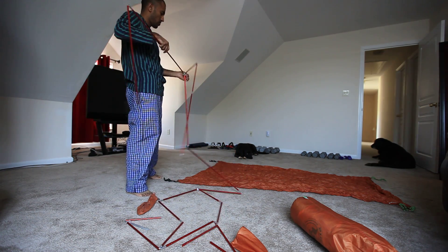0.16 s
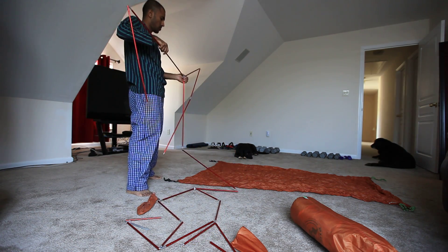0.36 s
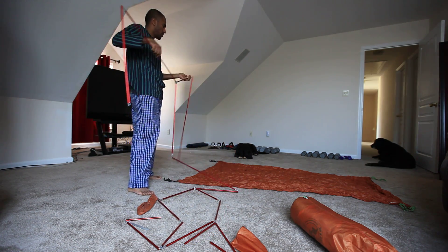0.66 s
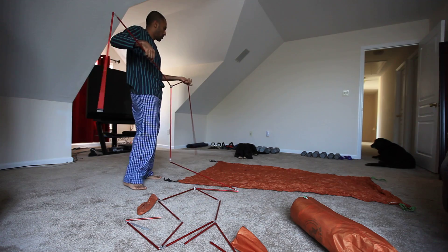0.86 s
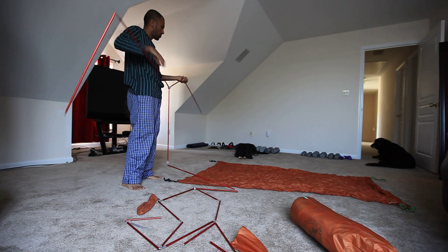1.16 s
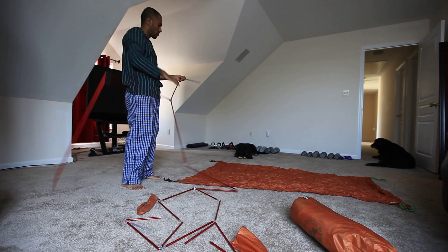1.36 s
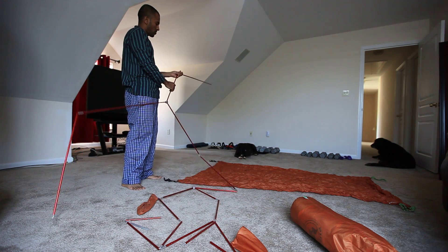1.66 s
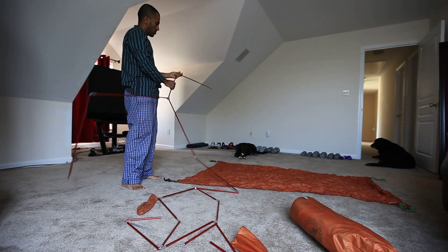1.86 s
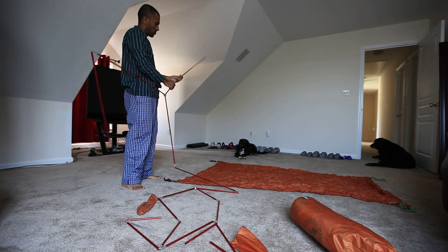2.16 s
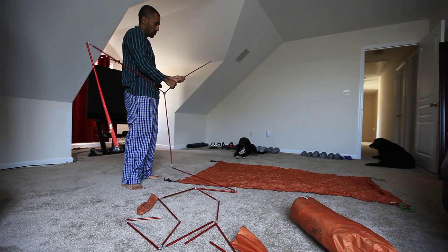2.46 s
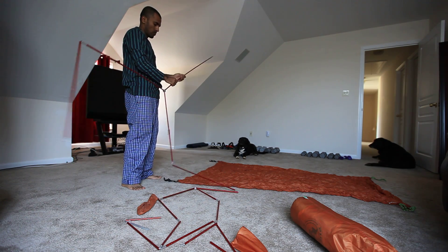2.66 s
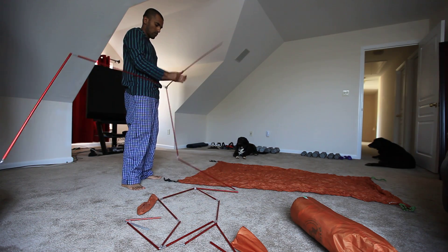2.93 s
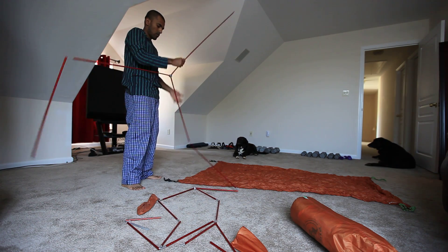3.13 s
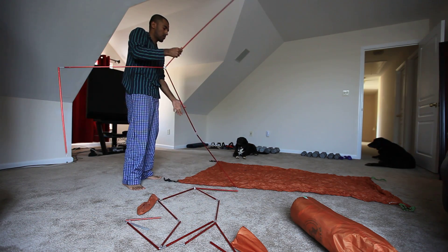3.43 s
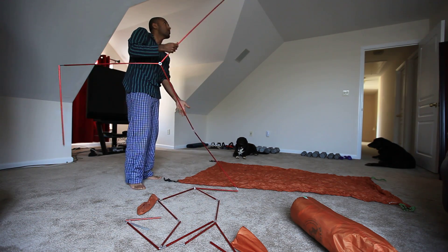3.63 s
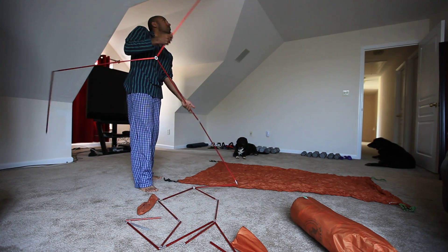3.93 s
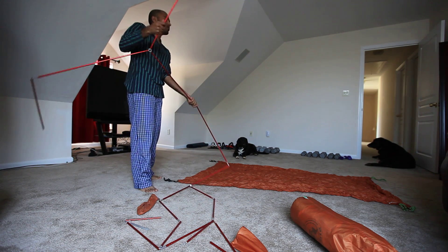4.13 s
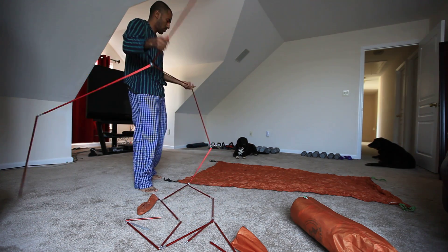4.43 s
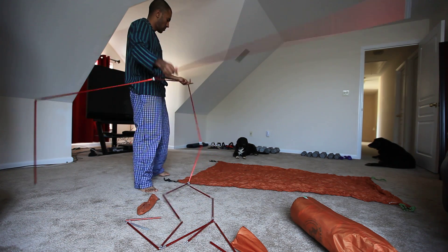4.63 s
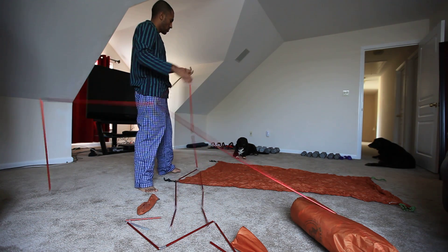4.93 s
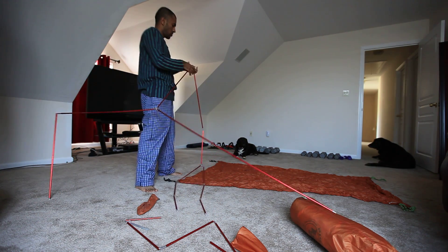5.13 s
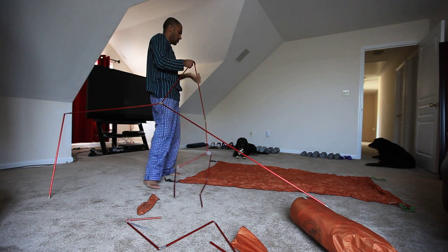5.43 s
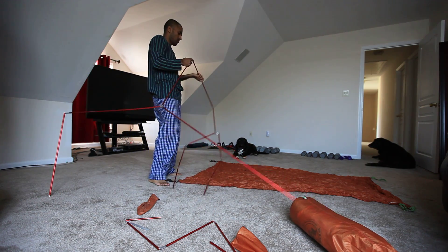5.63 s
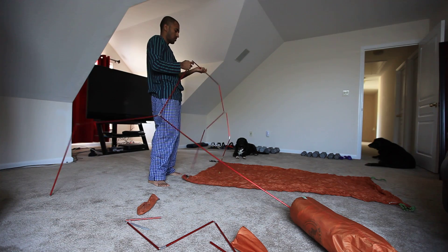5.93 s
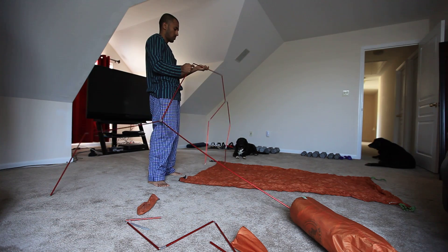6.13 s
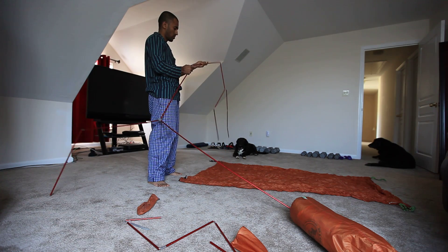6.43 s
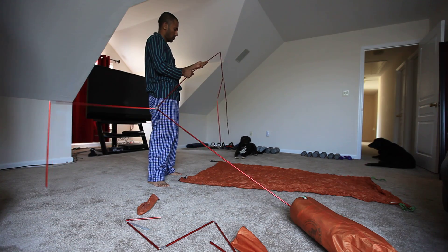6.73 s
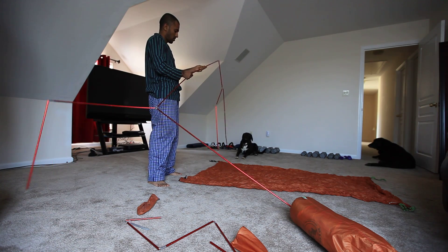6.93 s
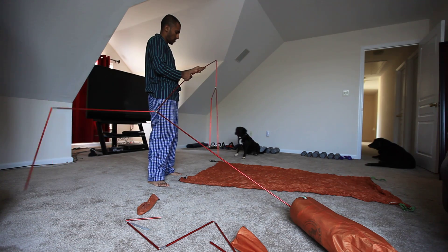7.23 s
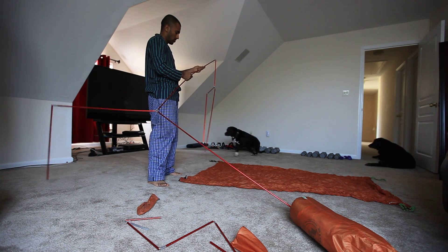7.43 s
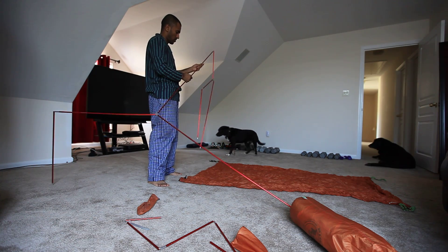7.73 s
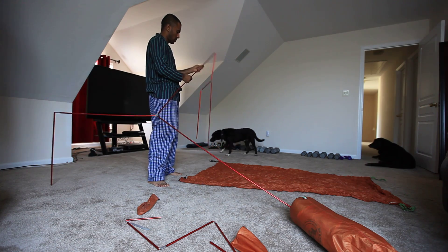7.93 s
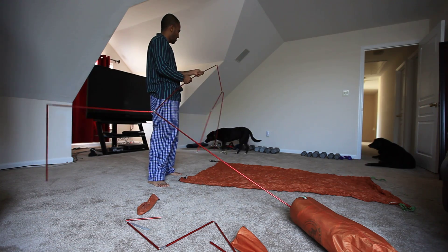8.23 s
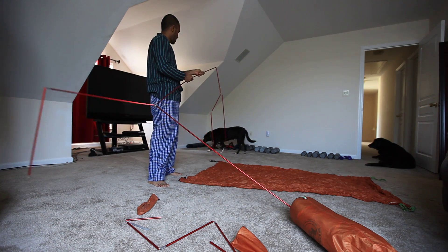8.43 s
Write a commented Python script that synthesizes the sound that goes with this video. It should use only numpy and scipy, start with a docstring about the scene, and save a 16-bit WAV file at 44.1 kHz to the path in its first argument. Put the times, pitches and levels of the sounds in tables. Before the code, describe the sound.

Sharp, irregular snaps and light rattles of a metal tent pole being unfolded indoors, over quiet clothing rustle and low room hum.

```python
"""Sharp metal snaps, ticks and rattles: a shock-corded aluminium tent pole unfolds in a carpeted attic.
The cord pulls each section into its ferrule; brief contact chatter rings the tube's modes.
Loose ends thud on the carpet, fabric rustles and a hand slides along the tube.
A dog's collar tags tinkle faintly over low room rumble; gain control ducks it all after hard snaps."""
import sys
import numpy as np
from scipy import signal
from scipy.fft import rfft, irfft
from scipy.io import wavfile
from scipy.ndimage import uniform_filter1d

SR = 44100
rng = np.random.default_rng(int(sys.argv[2]) if len(sys.argv) > 2 else 0)


def unload_audio(sound):
    """Save the sound as a 16-bit wav file, at the path given as the first command line argument."""
    columns = np.transpose(np.atleast_2d(sound))
    # keep every value between -1 and 1, then stretch to whole-number steps
    steps = np.round(np.clip(columns, -1, 1) * 32767)
    wavfile.write(sys.argv[1], SR, steps.astype(np.int16))


N = 378378
TIME = np.arange(N) / SR
HIT = 8192  # samples per impact
AGE, FREQ = np.arange(HIT) / SR, np.arange(HIT // 2 + 1) * SR / HIT
LEAD_S = 0.006  # silence ahead of each strike

# tube modes: f/Hz, width/Hz, level/dB
TUBE_MODES = [(1560, 50, 14), (1740, 61, 1.5), (2100, 120, -7), (2380, 61, -12.5), (2713, 160, 7),
              (2980, 110, 6.5), (3550, 420, 5.5), (4400, 120, -28), (4830, 120, 13), (5850, 55, -6.5),
              (6070, 81, -1), (6550, 130, -13), (6630, 33, 3.5), (7880, 110, 9.5), (8100, 50, -2),
              (9200, 50, -16.5), (10300, 60, -4), (10700, 120, 3), (13900, 130, -18), (14500, 90, 12.5)]
# metal contact spectrum: f/Hz, level/dB
CLICK_SPECTRUM = [(100, -15.5), (400, -37.5), (1000, -24.5), (2000, -14), (4000, -1.5), (7000, 5),
                  (9000, -1), (11000, -8), (12500, -17.5), (15500, -23)]
# fabric rustle as the arms move: t/s, level/dB
ARM_MOTION = [(0, -44.5), (.1, -32.5), (.4, -49), (.7, -50.5), (1.3, -55.5), (1.62, -39), (2.05, -71),
              (2.8, -51), (3.55, -68.5), (4.08, -36), (4.3, -47.5), (4.7, -46), (5.05, -35.5), (5.6, -46.5),
              (5.78, -48), (6.85, -49), (7.5, -90), (8.58, -63.5)]


def undb(db):
    """Decibels to gain."""
    return 10 ** (np.asarray(db) / 20)


def unit(x):
    """Scale to rms 1."""
    return x / np.sqrt(np.mean(x ** 2) + 1e-18)


def curve(rows):
    """Gain along a (t/s, level/dB) curve, silent outside it."""
    return undb(np.interp(TIME, *np.transpose(rows), left=-200, right=-200))


def colour(x, spectrum):
    """Filter by a (f/Hz, level/dB) spectrum."""
    hz, db = np.transpose(spectrum)
    f = np.arange(len(x) // 2 + 1) * SR / len(x)
    return irfft(rfft(x) * undb(np.interp(np.log(f + 1), np.log(hz), db)), len(x))


def resonance(f, hz, width_hz):
    """Response of one damped mode, 1 at its centre."""
    return 1 / (1 + 2j * (f - hz) / width_hz)


def add(track, s, sound):
    """Mix a sound in at time s."""
    start = int(np.clip(s * SR, 0, N - 1))
    track[start:start + len(sound)] += sound[:N - start]


def background(air_db=-45):
    """Low hum and rumble of the house with a faint hiss."""
    # hum bands: f/Hz, width/Hz, level/dB
    bands = [(35.56, 2.5, -47.5), (85, 7.1, -53), (120.45, 4.8, -55.5), (136.8, 4, -61)]
    # room noise spectrum: f/Hz, level/dB
    air_spectrum = [(12, -33), (20, 1), (38, -3), (60, -9), (86, -3.5), (182, -20), (310, -13),
                    (678, -27.5), (738, -24.5), (1960, -31), (2200, -34.5), (7110, -31), (10200, -40),
                    (12400, -45), (16000, -48.5)]
    f = np.arange(N // 2 + 1) * SR / N
    hum = sum(undb(db) * unit(irfft(rfft(rng.standard_normal(N)) * resonance(f, hz, width_hz) ** 2, N))
              for hz, width_hz, db in bands)
    return hum + undb(air_db) * unit(colour(rng.standard_normal(N), air_spectrum))


def attic(x, t60_s=(0.32, 0.28, 0.17), wet_db=-3, build_s=0.00069, echo_s=0.033, echo_db=-25.5):
    """One far-wall echo and a dense tail off sloping walls; treble dies first."""
    t = np.arange(SR // 2) / SR
    move_s = 0.3  # the tail changes as the pole moves
    build = 1 - np.exp(-(t / build_s) ** 2)
    splits = [signal.butter(2, hz, fs=SR, output="sos") for hz in (1500, 9500)]
    out = x + undb(echo_db) * np.pad(x, (int(echo_s * SR), 0))[:N]
    for s in np.arange(0, N / SR + move_s, move_s):
        noise = rng.standard_normal(len(t))
        low, below_top = (signal.sosfiltfilt(sos, noise) for sos in splits)
        bands = low, below_top - low, noise - below_top
        tail = build * sum(band * undb(-60 * t / t60) for band, t60 in zip(bands, t60_s))
        near = np.abs(TIME - s) < move_s
        faded = x[near] * np.cos(np.pi / 2 * (TIME[near] - s) / move_s)
        add(out, TIME[near][0], undb(wet_db) * signal.fftconvolve(faded, unit(tail) / np.sqrt(len(t))))
    return out


def clinks():
    """The collar's steel ring knocks its buckle and rings at several pitches."""
    # knocks: t/s, level/dB
    knocks = [(6.759, -44), (6.93, -51), (7.521, -55), (7.821, -52.5)]
    # ring modes: f/Hz, level/dB, t60/s
    modes = [(2500, -1, 0.11), (4330, -1.5, .12), (6450, -3.5, .08), (7607, -2, .08), (10850, -0.5, .08),
             (13550, -13, .08)]
    out = np.zeros(N)
    for s, db in knocks:
        for hz, mode_db, t60 in modes:
            start_db = db + mode_db + 2 * rng.standard_normal()
            add(out, s, undb(start_db - 60 * AGE / t60) * np.sin(2 * np.pi * hz * AGE))
    return out


def tags(tick_db=-1, tick_s=0.0022, ring_db=-8, bounce_s=0.0044, bounce_db=-11):
    """The dog's metal tags buzz together, ring briefly and bounce once."""
    # touches: t/s, level/dB
    touches = [(1.926, -37), (1.973, -32.5), (2.168, -36), (2.302, -37), (6.804, -31), (6.932, -27.5),
               (7.565, -33), (7.927, -25.5), (8.061, -41.5), (8.117, -42.5), (8.151, -38.5), (8.327, -39),
               (8.525, -34.5)]
    # tag modes: f/Hz, level/dB, t60/s
    modes = [(5560, -13, 0.14), (6220, 5, 0.11), (6800, -11, 0.16), (7400, 0, .05), (8650, -4, 0.02),
             (11600, -1, .05), (11900, -18, 0.15), (12750, -4.5, .09), (14600, -19, 0.11)]
    # tag contact spectrum: f/Hz, level/dB
    tick_spectrum = [(2000, -29), (4500, -25), (6300, 6), (8000, 2), (10000, -5.5), (12400, -4.5),
                     (13200, -13.5), (15500, -20)]
    out = np.zeros(N)
    for s, db in touches:
        first, second = rng.standard_normal((2, HIT))
        low_db = np.interp(s, (5.8, 9.7), (-12, 1))  # low modes muffled until the dog gets up
        gap_s = bounce_s * np.exp(0.33 * first[-1])
        for late_s, drop_db, noise in (0, 0, first), (gap_s, bounce_db, second):
            ring = np.zeros(HIT)
            for (hz, mode_db, t60), jitter in zip(modes, noise):
                decay = undb(mode_db + low_db * (hz < 10000) + 2.8 * jitter - 60 * AGE / t60)
                ring += decay * np.sin(2 * np.pi * hz * (1 + 0.0068 * jitter) * AGE)
            tick = unit(colour(noise, tick_spectrum)) * np.exp(-AGE / tick_s)
            add(out, s + late_s, undb(db + drop_db) * (undb(ring_db) * ring + undb(tick_db) * tick))
    return out


def friction(spectrum, grain_db, grain_s):
    """Rubbing: a stream of tiny, uneven slips."""
    slips = unit(uniform_filter1d(rng.standard_normal(N), max(int(grain_s * SR), 2)))
    return unit(colour(rng.standard_normal(N) * undb(grain_db * slips), spectrum))


def cloth(gain_db=-3):
    """Fabric rubs as the arms swing."""
    # rustle spectrum: f/Hz, level/dB
    spectrum = [(100, -28), (500, -8), (1200, -7.5), (3000, -5), (7000, 0), (9500, -9.5), (12500, -18.5),
                (16000, -29)]
    return undb(gain_db) * friction(spectrum, grain_db=4, grain_s=0.0014) * curve(ARM_MOTION)


def hand_slide(gain_db=-2):
    """A hand rubs along the pole once."""
    # stroke: t/s, level/dB
    stroke = [(5.954, -24.5), (5.96, -26.5), (5.987, -21), (6.03, -30.5), (6.085, -19.5), (6.135, -33.5),
              (6.17, -24), (6.22, -59)]
    # hand-on-tube spectrum: f/Hz, level/dB
    spectrum = [(180, -21), (300, -15), (737, -11), (1040, -12.5), (1340, -5.5), (1930, -12), (2930, -9),
                (4230, -12.5), (6520, -7), (16000, -33.5)]
    return undb(gain_db) * friction(spectrum, grain_db=3.5, grain_s=0.0051) * curve(stroke)


def thuds(boom_s=0.0079, boom_db=-2, scuff_s=0.0093):
    """Carpet cushions a falling pole end: short floor boom, dull scuff."""
    # landings: t/s, level/dB, boom f/Hz, relative scuff/dB
    landings = [(1.449, -16.5, 410, -1.5), (1.475, -30, 288, 4.5), (4.381, -20, 242, -11.5),
                (4.92, -17.5, 227, -1), (4.944, -28, 280, 1.5), (4.983, -18.5, 295, -8),
                (4.989, -18.5, 119, -13.5)]
    # scuff spectrum: f/Hz, level/dB
    spectrum = [(30, -6.5), (100, -0.5), (200, 3), (330, 2.5), (500, -7.5), (700, -13.5), (1000, -11),
                (2500, -12), (8000, -31.5)]
    out = np.zeros(N)
    for s, db, hz, scuff_db in landings:
        boom = np.sin(2 * np.pi * hz * AGE) * np.exp(-AGE / boom_s)
        scuff = unit(colour(rng.standard_normal(HIT), spectrum)) * np.exp(-AGE / scuff_s)
        add(out, s, undb(db) * (undb(boom_db) * boom + undb(scuff_db) * scuff))
    return out


def tube(gains, ring_db=-4):
    """Section response: bare contact plus modes, weighted by where the blow lands."""
    modes = sum(gain * undb(db) * resonance(FREQ, hz, width_hz)
                for gain, (hz, width_hz, db) in zip(gains, TUBE_MODES))
    return 1 + undb(ring_db) * modes


def scrape(ring_db=6, gain_db=-2):
    """A ferrule dragged along its tube keeps the modes singing."""
    # drag: t/s, level/dB
    drag = [(3.9, -71), (3.97, -47), (4.08, -43), (4.2, -41.5), (4.28, -65.5)]
    # metal friction spectrum: f/Hz, level/dB
    spectrum = [(400, 3), (1500, -17), (2300, -18), (2730, 3.5), (3200, -8.5), (4200, -12), (7000, 12),
                (9000, -7), (12500, -2), (15500, -22)]
    ring = irfft(tube(np.ones(len(TUBE_MODES)), ring_db))
    rubbing = friction(spectrum, grain_db=9, grain_s=0.00067)
    return undb(gain_db) * curve(drag) * unit(signal.fftconvolve(rubbing, ring)[:N])


def rattles(knocks_per_s=800, scatter_db=3, chatter_s=0.0039):
    """Slack sections knock together in quick, uneven runs after a fall."""
    # runs: t/s, length/s, level/dB
    runs = [(1.447, 0.012, -18.5), (1.474, 0.015, -14.5), (1.52, 0.043, -27), (4.381, 0.0062, -19),
            (4.943, 0.034, -18), (4.983, 0.059, -23.5), (5.048, 0.05, -36.5), (5.1, 0.022, -23)]
    # rattle spectrum: f/Hz, level/dB
    spectrum = [(300, -5), (1000, -19), (2200, -5), (4500, -2.5), (7500, 5.5), (10000, -12.5),
                (13000, -17.5), (16000, -40)]
    out = np.zeros(N)
    for s, length_s, db in runs:
        knocks = (rng.random(HIT) < knocks_per_s / SR) * undb(scatter_db * rng.standard_normal(HIT))
        knocks[0] = 1
        envelope = signal.fftconvolve(knocks * (AGE < length_s), np.exp(-AGE / chatter_s))[:HIT]
        chatter = envelope * rng.standard_normal(HIT)
        ring = irfft(rfft(chatter) * tube(rng.standard_normal(len(TUBE_MODES))))
        add(out, s, unit(ring) * np.sqrt(length_s * SR / HIT) * undb(db))
    return colour(out, spectrum)


def contact(burst):
    """Flattened spectrum of a burst: the tube sends out a different sound in every direction, so the room hears
    an even spectrum."""
    spectrum = rfft(burst)
    power = np.abs(spectrum) ** 2
    return spectrum / np.sqrt(power / np.mean(power) + 0.06)


def strike(noise, low_db, top_db, ring_hz, ring_db, chatter_s, attack_s=0.004, rise_s=0.0003):
    """Metal hits metal: dense chatter rings the tube; rms 1 over the attack."""
    since = AGE - LEAD_S
    onset = np.clip(1 + since / rise_s, 0, 1)
    chatter = np.exp(-(np.abs(since) / chatter_s) ** 1.8)
    buzz = undb(-13) * np.exp(-np.abs(since) / (2.2 * chatter_s))
    force = contact(noise * onset * (chatter + buzz))
    mode_gains = np.cos(np.pi * noise[::-1])
    body = tube(mode_gains) + undb(ring_db) * resonance(FREQ, ring_hz, width_hz=330)
    # broad contacts are duller, edge-on ones brighter
    tilt = undb(np.interp(FREQ, [2500, 4500, 8500, 11000], [low_db, 0, 0, top_db]))
    hit = onset * colour(irfft(force * body * tilt), CLICK_SPECTRUM)
    attack = hit[(since > 0) & (since < attack_s)]
    return hit[:HIT // 2] / np.sqrt(np.mean(attack ** 2))


def tap(noise, bright_db):
    """One light contact, its pitch a little different each time."""
    return strike(noise, low_db=2.5 - bright_db, top_db=-4 + bright_db,
                  ring_hz=6770 * (1 + 0.063 * noise[0]), ring_db=-7, chatter_s=0.0029)


def ticks(start_s=0.72, per_s=4, base_db=-43.5, scatter_db=2.5, follow=0.21, max_ticks=96):
    """Slack joints tick at random, harder when the arms move more."""
    out = np.zeros(N)
    effort_db = np.interp(TIME, *np.transpose(ARM_MOTION))
    effort_db -= np.median(effort_db)
    times = start_s + np.cumsum(rng.exponential(size=max_ticks)) / per_s
    for s, noise in zip(times[times < N / SR], rng.standard_normal((max_ticks, HIT))):
        db = base_db + follow * np.interp(s, TIME, effort_db) + scatter_db * noise[1]
        add(out, s, undb(db) * tap(noise, bright_db=5 + 4 * noise[2]))
    return out


def taps():
    """Unseated ends meet as the pole is turned over."""
    # touches: t/s, attack level/dB, brightness/dB
    touches = [(0.065, -26.5, 5), (0.2386, -15, -1), (0.248, -8, 2.5), (0.884, -27.5, -8), (0.974, -33, -9),
               (1.4309, -28, -9), (1.467, -13, -3.5), (1.6454, -18.5, -0.5), (1.8832, -36, -11),
               (2.4893, -38, 0), (2.6241, -28, -4), (2.785, -33, 4), (2.8265, -33, -6), (2.848, -26, -4.5),
               (3.1762, -33, -10), (3.274, -30.5, 11), (3.717, -28.5, -7.5), (3.8298, -34, -15),
               (3.862, -37.5, 6), (4.092, -19, -7.5), (4.177, -27.5, 6), (4.2646, -36.5, 12),
               (4.6846, -29.5, -4), (4.931, -15, -4), (5.015, -14.5, -1), (5.1182, -18, 4),
               (5.4666, -38, -9), (6.053, -13.5, -0.5), (7.3874, -28, -9.5)]
    out = np.zeros(N)
    for s, db, bright_db in touches:
        add(out, s - LEAD_S, undb(db) * tap(rng.standard_normal(HIT), bright_db))
    return out


def snaps(seat_s=0.022, pop_s=0.00031):
    """The cord pulls a section into its ferrule: it scrapes, seats hard and rebounds once."""
    # seatings: t/s, attack level/dB, low end/dB, top end/dB, ring f/Hz, ring level/dB, chatter/s,
    # rebound delay/s, relative rebound/dB
    seatings = [(0.153, -4.5, 1.5, -4, 1670, 2.5, 0.0028, 0.009, -9),
                (0.2671, -6.5, 1.5, -9, 2110, 8.5, .0024, 0.0025, -19.5),
                (0.675, 8.5, -3, 1, 9700, 11, 0.0032, 0.018, -13.5),
                (2.647, -8.5, 6.5, -2, 5350, -1.5, 0.0033, .006, -17),
                (4.3929, -13, 6, -8, 6470, -24, 0.0016, .003, -7.5),
                (4.7306, -13, -0.5, 0.5, 7700, 12.5, 0.00054, 0.0066, 4.5),
                (5.7198, 15.5, 0.5, 6.5, 6470, 5.5, 0.0043, .006, -34),
                (6.2872, -10, 4, 4.5, 7100, 9, 0.0056, 0.014, -3.5),
                (6.971, 10.5, -1, 6.5, 8750, 5, 0.0011, 0.016, -8.5),
                (7.1643, 11, -1.5, 9, 6970, 3.5, 0.0022, 0.012, -15.5)]
    out = np.zeros(N)
    pop_phase = (AGE - LEAD_S) / pop_s
    overload_pop = 2 * pop_phase * np.exp(-pop_phase ** 2 / 2)
    slide_ramp = AGE / seat_s * (AGE < seat_s)
    for s, db, *timbre, rebound_s, rebound_db in seatings:
        slip, first, second = rng.standard_normal((3, HIT))
        slide_db = -34 + 0.4 * db
        pop_db = -45.5 + 2.49 * db  # the hardest snaps overload the microphone with a short low pop
        add(out, s - seat_s, undb(slide_db) * unit(colour(slip, CLICK_SPECTRUM)) * slide_ramp)
        add(out, s - LEAD_S, undb(db) * strike(first, *timbre))
        add(out, s - LEAD_S, undb(pop_db) * overload_pop)
        add(out, s + rebound_s - LEAD_S, undb(db + rebound_db) * strike(second, *timbre))
    return out


def gain_control(x, ceiling_db=-11, start_cut=0.65, release_s=1.88, lag_s=0.00076):
    """Pulls any loud 4 ms down to a ceiling, slightly late, then lets go slowly."""
    power = np.abs(uniform_filter1d(x ** 2, size=SR // 250)) + 1e-12
    cut = np.clip(1 - undb(ceiling_db) / np.sqrt(power), 0, 1)
    release = np.exp(-TIME / release_s)
    held = release * np.maximum.accumulate(np.maximum(cut / release, start_cut))
    return x * (1 - np.interp(TIME - lag_s, TIME, held))


def scene():
    """Pole, collar and handling in the attic, over the background; mono."""
    pole = snaps() + taps() + rattles() + scrape()
    collar = tags() + clinks()
    handling = thuds() + cloth() + hand_slide() + ticks()
    return (attic(pole + collar + handling) + background())[None]


def record(dry):
    """Gain control, clipping of the sharpest peaks, steep treble cut."""
    clipped = np.clip(gain_control(dry[0]), -1, 1)
    top_hz = 15900
    lowpass = signal.ellip(8, 0.2, 70, top_hz, fs=SR, output="sos")
    return signal.sosfilt(lowpass, clipped)[None]


dry = scene()
out = record(dry)
unload_audio(out)
```